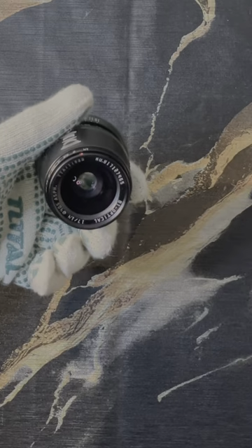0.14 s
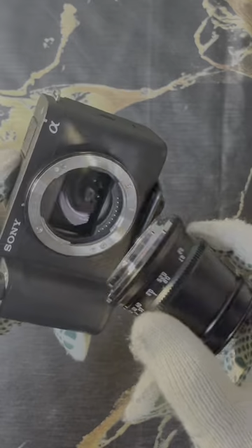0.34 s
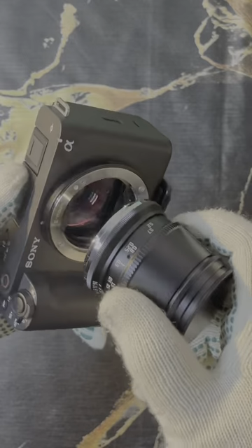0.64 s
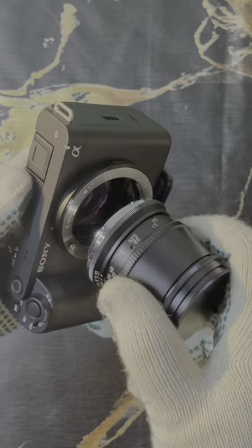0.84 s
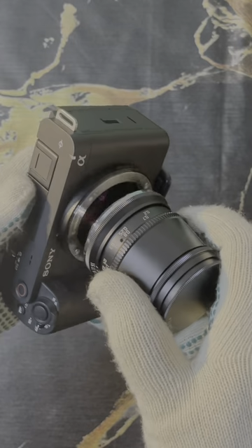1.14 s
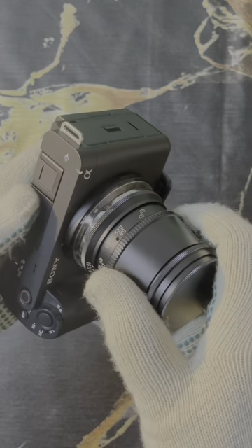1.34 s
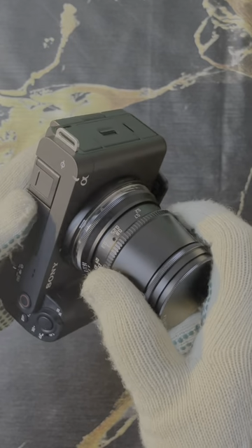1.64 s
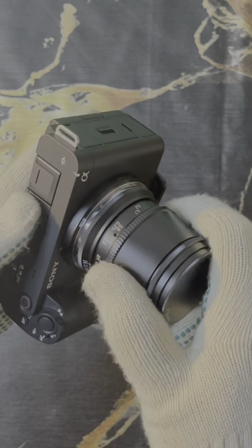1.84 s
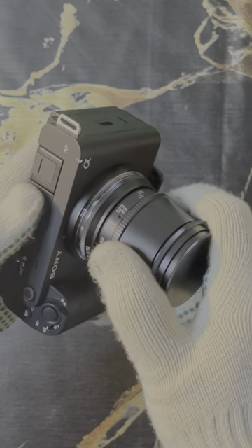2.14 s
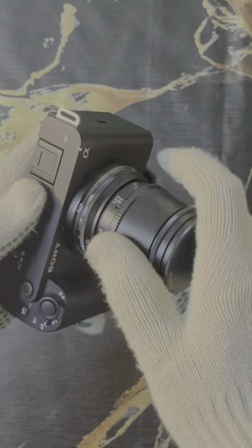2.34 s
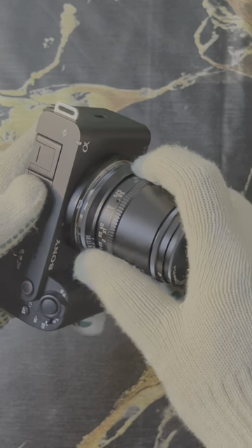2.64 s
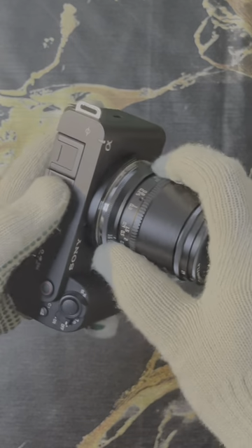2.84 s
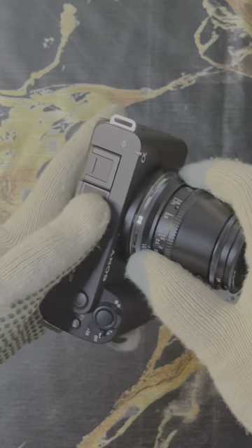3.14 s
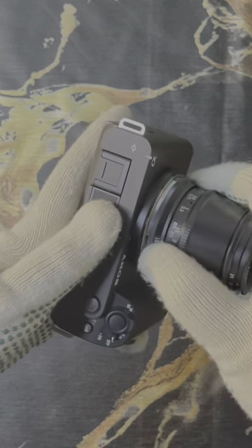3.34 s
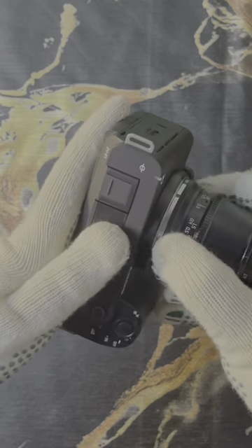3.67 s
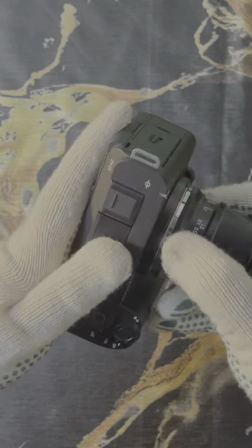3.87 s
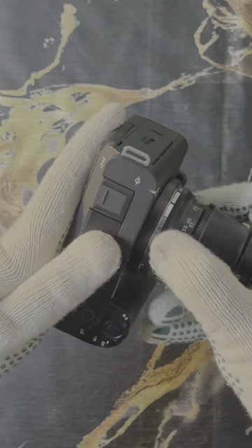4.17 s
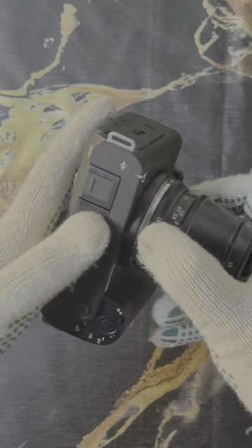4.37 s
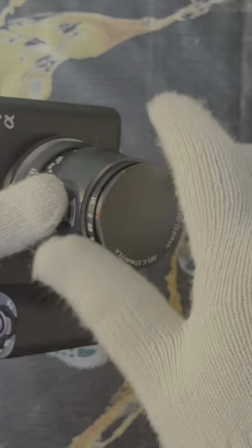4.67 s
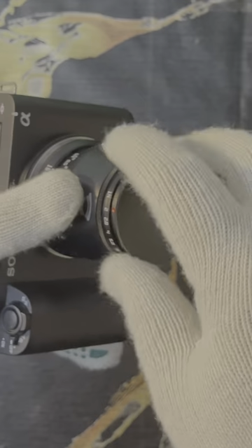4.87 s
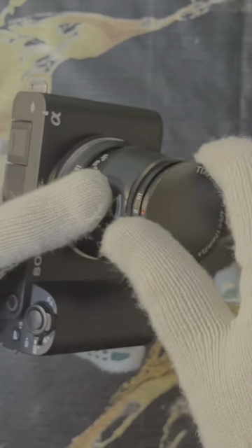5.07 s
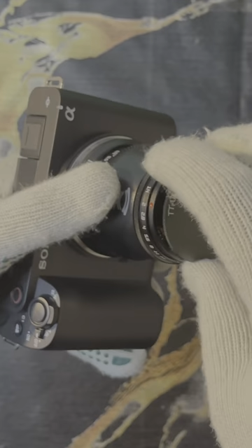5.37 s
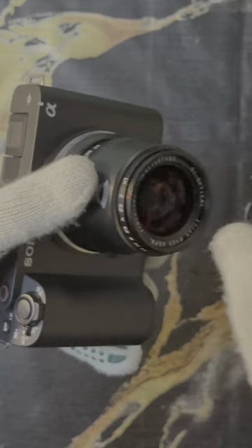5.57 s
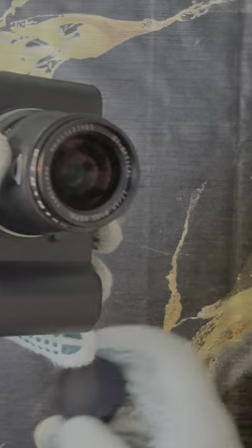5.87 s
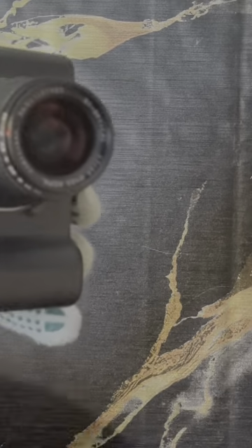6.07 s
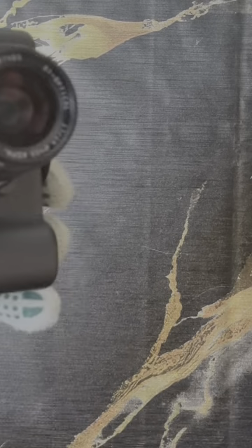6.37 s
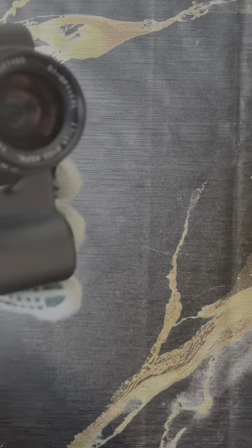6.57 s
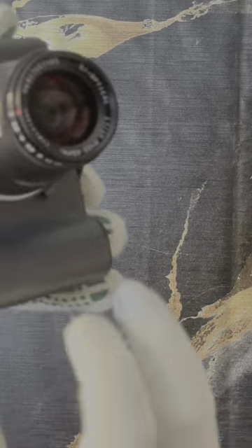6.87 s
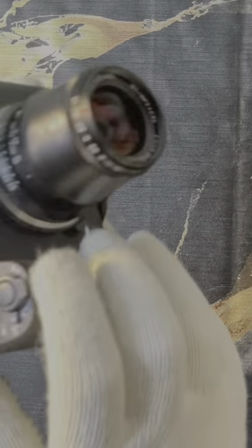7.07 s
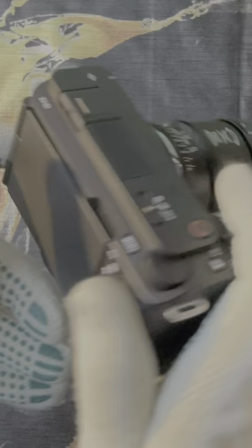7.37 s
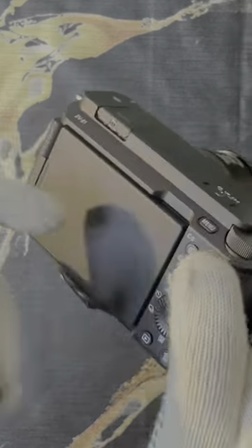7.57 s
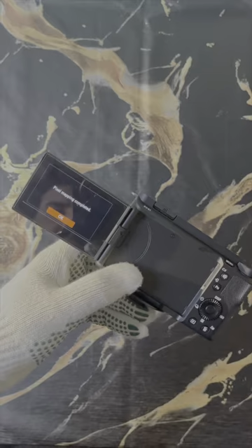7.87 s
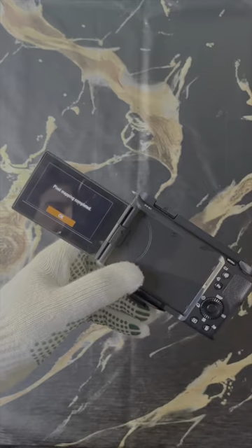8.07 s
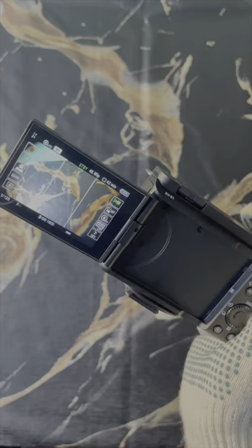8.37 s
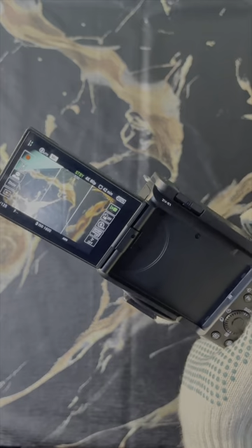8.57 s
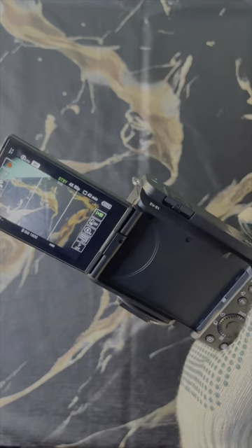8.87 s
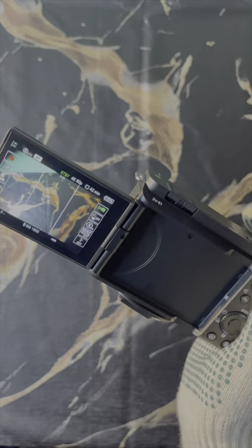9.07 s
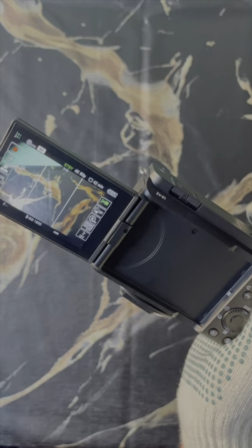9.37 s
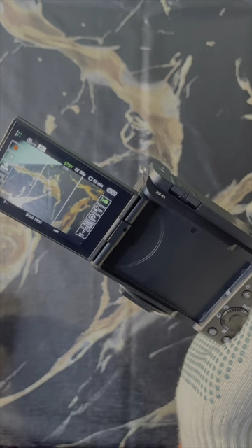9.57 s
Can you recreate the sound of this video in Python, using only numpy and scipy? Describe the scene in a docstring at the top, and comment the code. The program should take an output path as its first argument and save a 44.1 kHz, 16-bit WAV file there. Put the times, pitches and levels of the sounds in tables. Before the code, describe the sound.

Close stereo microphones, slightly stronger on the left, catch dry clicks of lens against camera body over low room rumble. Seating knocks lead to a sharp locking snap, followed by short raspy twists of a metal cap with a thin squeak. The cap lands lightly on the table, cloth slides softly, small clicks and padded bumps follow, and a button presses and releases quietly.

```python
"""A small room with a low hum: gloved hands seat a metal lens on a camera body, twist it until the lock
pin snaps home, unscrew the metal lens cap in a few pushes, set it down, turn the camera over and press a button.
Blows excite damped modes and a noise crack; thread and gloves are trains of friction slips, filtered;
rims are noise-driven resonators. The room answers with dense decaying noise; two ports listen close by."""
import sys
import numpy as np
from scipy import signal
from scipy.fft import rfft, irfft, next_fast_len
from scipy.io import wavfile

SR = 44100
rng = np.random.default_rng(int(sys.argv[2]) if len(sys.argv) > 2 else 0)


def bounce(signal):
    """Save signal as a 16-bit WAV file at the path given by the first command-line argument."""
    frames = np.transpose(np.atleast_2d(signal))
    limited = np.clip(frames, -1, 1)
    pcm = np.round(limited * 32767).astype(np.int16)
    wavfile.write(sys.argv[1], SR, pcm)


N = 428211  # length in samples


def amp(db):
    """Logarithmic level: decibels to amplitude gain."""
    return 10 ** (np.asarray(db) / 20)


def unit(x):
    """Normalisation: scales to rms 1."""
    return x / np.sqrt(np.mean(x ** 2) + 1e-24)


def read(points, hz):
    """Interpolation: joins points by straight lines on a log-frequency axis."""
    f, value = np.transpose(points)
    return np.interp(np.log(hz + 1), np.log(f + 1), value)


def add(mix, s, sound):
    """Superposition: mixes a sound in at time s."""
    part = mix[..., max(round(s * SR), 0):][..., :sound.shape[-1]]
    part += sound[..., :part.shape[-1]]


def colour(x, gain_at):
    """Linear filtering: multiplies the spectrum by a gain given as a function of frequency."""
    n = x.shape[-1]
    size = next_fast_len(n + 2048)
    f = np.fft.rfftfreq(size, 1 / SR)
    return irfft(rfft(x, size) * gain_at(f), size)[..., :n]


def wander(n, rate):
    """Low-passed noise: slow random motion of rms 1."""
    return unit(colour(rng.standard_normal(n), lambda f: np.exp(-(f / rate) ** 2)))


def pan(db):
    """Level difference at constant power: gains of left and right, left higher by db."""
    left = amp(db)
    return np.array([[left], [1]]) * np.sqrt(2 / (1 + left ** 2))


# spectral coherence of the two ports for distant sound: f/Hz, coherence
COHERENCE = [(60, .98), (130, 0.8), (290, .7), (640, 0), (15000, 0)]
# relative spectrum of the room noise: f/Hz, spectral level/dB
NOISE_SPECTRUM = [(15, -33), (30, -14), (42, -3), (62, -2), (82, -7), (108, -7), (150, -19.5), (220, -20.5),
                  (320, -27), (480, -36.5), (1000, -42.5), (2500, -51), (9000, -54), (15000, -65.5)]
NOISE_DB = -54  # rms, before the balance of the ports
# tones of the hum: f/Hz, level/dB (rms, before the balance of the ports)
HUM_TONES = [(59.7, -59), (100, -67)]


def room_noise(left_db=2.5):
    """Partly coherent noise: a low rumble and faint hiss, with a hum whose phase wanders."""
    def shared(f):
        return np.clip(read(COHERENCE, f), -1, 1)

    def independent(f):
        return np.sqrt(1 - shared(f) ** 2)

    a, b = rng.standard_normal((2, N))
    pair = np.array([a, colour(a, shared) + colour(b, independent)])
    noise = amp(NOISE_DB) * unit(colour(pair, lambda f: amp(read(NOISE_SPECTRUM, f))))
    t = np.arange(N) / SR
    hum = np.zeros(N)
    for hz, db in HUM_TONES:
        phase = 2 * np.pi * hz * t + 0.28 * wander(N, 0.64)
        hum += amp(db) * np.sqrt(2) * np.sin(phase)
    return (noise + hum) * pan(left_db)


# a faint dry tick at the outset: t/s, peak level/dB
FIRST_TICK = (.2063, -45.5)


def tick():
    """Exponential pulse: a bare tick with no ring and no echo, alike in both ports."""
    s, db = FIRST_TICK
    out = np.zeros(N)
    add(out, s, amp(db) * np.exp(-np.arange(2 ** 6) / 22.0))  # times in samples
    return out


# modes of the camera with the lens against it: f/Hz, relative level/dB, t60/s
BODY_MODES = [(352.8, -10, 0.26), (418, -14.5, 0.21), (558.2, -5, .035), (810, -5, 0.064),
              (894, -3.5, 0.03), (962, -11, 0.033), (1250, -1, 0.011), (1490, 0, .025), (1574, -3, 0.014),
              (2230, -10, 0.022), (2600, -1, 0.028), (4360, -5, 0.045), (5610, -3, 0.021), (7850, -3, 0.01),
              (9780, 2, 0.026)]
# edges of the bands in which an average blow is described: f/Hz
BAND_EDGES = [250, 650, 1200, 3000, 7000, 14000]
# an average blow's share in each band between those edges: level/dB
BAND_SHARES = [-14.5, -11.5, -9, -6.5, -14]
# the crack of a blow of FIRM_DB dies in DECAY_MS; harder and brighter ones are shorter, light ones scuff on
FIRM_DB, DECAY_MS, HALVING_DB, HALVING_DB_PER_OCTAVE = -40, 3.7, 20.5, 12
PART_OCTAVES = 0.38  # the part struck stands out this widely around its own pitch


def click(level_db, tilt_db, part_hz, part_db, crack_db=14, rise_share=0.23, grip=0.022,
          low_hz=280, high_hz=11000):
    """Impact excitation: damped modes and a noise crack, weighted by how hard and where the contact is."""
    size = 8192
    t, f = np.arange(size) / SR, np.fft.rfftfreq(size, 1 / SR)
    halvings = (level_db - FIRM_DB) / HALVING_DB + tilt_db / HALVING_DB_PER_OCTAVE
    decay_s = DECAY_MS / 2 ** halvings / 1000

    # each new grip loads the modes differently
    detune = 1 + grip * rng.standard_normal(len(BODY_MODES))
    ring = np.zeros(size)
    for k, (hz, db, t60) in enumerate(BODY_MODES):
        ring += (-1) ** k * amp(db - 60 * t / t60) * np.sin(2 * np.pi * hz * detune[k] * t)
    crack = amp(crack_db) * rng.standard_normal(size) * np.exp(-t / decay_s)
    onset = 1 - np.exp(-t / (rise_share * decay_s))
    blow = rfft((ring + crack) * onset)

    # bring the bands to the average blow, then tilt them and lift the part struck
    radiated = 1 / np.hypot(1, (low_hz / (f + 20)) ** 3) / np.hypot(1, (f / high_hz) ** 6)
    edges, power = np.array(BAND_EDGES), abs(blow * radiated) ** 2
    have = np.array([power[(f > a) & (f < b)].sum() for a, b in zip(edges, edges[1:])])
    centres = np.sqrt(edges[1:] * edges[:-1])
    average_db = read(np.c_[centres, BAND_SHARES - 10 * np.log10(have)], f)
    octaves = np.log2(np.maximum(f, edges[0]) / part_hz)
    contact_db = tilt_db * octaves + part_db * np.exp(-0.5 * (octaves / PART_OCTAVES) ** 2)

    # minimum phase keeps the filter from sounding before the blow
    log_gain = np.log(radiated * amp(average_db + contact_db))
    mirrored = np.r_[log_gain, log_gain[-2:0:-1]]
    causal = np.exp(np.conj(signal.hilbert(mirrored)))[:len(f)]
    fade = np.cos(np.pi / 2 * np.arange(size) / size) ** 2
    sound = irfft(blow * causal) * fade
    # the level is the energy of the blow spread over 10 ms
    return amp(level_db) * np.sqrt(SR / 100) * sound / np.linalg.norm(sound)


# reverberation time of the room: f/Hz, t60/s
REVERBERATION = [(250, 0.78), (700, 0.37), (1700, 0.37), (4500, 0.28), (9000, 0.28), (14000, 0.083)]


def room(x, first_s=0.002, build_s=0.0012):
    """Diffuse reverberation: dense reflections build up quickly, each band dying at its own speed."""
    f, t, z = signal.stft(rng.standard_normal((2, SR * 3 // 4)), SR, nperseg=256)
    decay = amp(-60 * t / read(REVERBERATION, f)[:, None])
    tail = signal.istft(z * decay, SR, nperseg=256)[1]
    tail *= np.clip((np.arange(tail.shape[1]) / SR - first_s) / build_s, 0, 1)
    return signal.fftconvolve(x[None], tail / np.linalg.norm(tail[0]), axes=1)[:, :N]


def direct_and_echo(version, left_db, room_db, count=3):
    """Diffuse echo: several independent versions of the sound are averaged, so the reverberation is smooth."""
    direct = pan(left_db) * version()
    # dividing by the root of the count keeps the power of one version
    echo = sum(room(version()) for _ in range(count)) / np.sqrt(count)
    return direct, amp(room_db) * echo


def blows(rows, part_db, left_db, room_db):
    """Successive impacts at one place: the direct sound and its echo."""
    def version():
        out = np.zeros(N)
        for s, *contact in rows:
            add(out, s, click(*contact, part_db))
        return out
    return direct_and_echo(version, left_db, room_db)


# clicks and knocks of lens and body, and of the cap breaking free at 4.44 s: t/s, level/dB, brightness/(dB per
# octave), f/Hz of the part struck
LENS_CLICKS = [(0.9541, -39.5, 1, 9200), (0.9635, -48.5, -1, 1680), (1.1994, -47.5, 2, 900),
               (1.2577, -41, -4.5, 850), (1.3543, -42, -1.5, 950), (1.3622, -40, -2, 870),
               (1.3857, -41.5, -2.5, 900), (1.4017, -30, 0, 950), (1.4142, -28, 1, 1200),
               (1.6995, -62, -2, 800), (1.7212, -48, -1, 1200), (2.2477, -36.5, 0.1, 904),
               (2.2539, -36.5, -1, 1970), (2.3227, -46, -0.5, 400), (3.3067, -49, -2, 950),
               (3.333, -51.5, -0.4, 2000), (3.4688, -49, -1.5, 3200), (3.8497, -37, 10.5, 5000),
               (3.8518, -28.5, 3, 9500), (3.9584, -26.5, 1.5, 1830), (4.4395, -41.5, 6.5, 5830),
               (4.5746, -52, -1, 3500), (4.745, -60, -1.5, 2600), (4.7834, -43, 3.5, 5000),
               (4.926, -51.5, 0.5, 2000), (7.2322, -51.5, 6, 8520), (7.47, -61.5, -2, 2530),
               (7.4835, -48.5, 3.5, 7850)]
# metal parts left ringing, such as the lock spring: t/s, f/Hz, level/dB, t60/s
METAL_RINGS = [(.955, 4517, -65, .35), (.955, 4720, -61, .4), (1.259, 830, -44, .07),
               (1.258, 867, -56, 0.35), (1.415, 404, -50, 0.28), (1.402, 905, -42, .14),
               (2.254, 855, -51, 0.22), (3.96, 1464, -52, .16), (3.853, 2456, -42, .68)]


def lens_and_body(ring_left_db=3, ring_room_db=-13):
    """Impact and free vibration: all clicks and the ringing they leave, direct and echoed."""
    direct, echo = blows(LENS_CLICKS, part_db=9, left_db=5.0, room_db=-10.0)
    ring, t = np.zeros(N), np.arange(SR) / SR
    for s, hz, db, t60 in METAL_RINGS:
        add(ring, s, amp(db - 60 * t / t60) * np.sin(2 * np.pi * hz * t))
    return direct + pan(ring_left_db) * ring, echo + room(amp(ring_room_db) * ring)


def resonate(x, hz, width):
    """Heterodyne resonance: shifts the curve hz down to zero, low-passes, and shifts back."""
    turn, r = np.exp(2j * np.pi * np.cumsum(hz) / SR), np.exp(-np.pi * width / SR)
    return (turn * signal.lfilter([(1 - r) ** 2], [1, -2 * r, r * r], x / turn)).real


# a metal rim of mount or cap singing as it slips: start t/s, end t/s, f/Hz, level/dB before the mix
RIM_SQUEALS = [(1.129, 1.25, 866, -70), (2.794, 2.812, 1730, -72), (4.783, 4.81, 4960, -56),
               (4.8, 4.889, 7670, -39.5), (4.84, 4.9, 7660, -54), (5.248, 5.262, 7600, -48),
               (5.744, 5.776, 7610, -69.5)]


def metal_rim(ring_t60=0.09):
    """Stick-slip excitation: uneven slips, as noise, drive a narrow rim mode that rings on after the stroke."""
    out, t = np.zeros(N), np.arange(SR // 4) / SR
    for start, end, hz, db in RIM_SQUEALS:
        rise = np.minimum(t / 0.0044, 1)
        swell = rise * amp(db - 60 * np.maximum(t - (end - start), 0) / ring_t60)
        tone = resonate(rng.standard_normal(len(t)), np.full(len(t), hz), width=170)
        add(out, start, swell * unit(tone))
    return out


def slips(n, per_s, spread_db):
    """Dry friction: a dense random train of tiny slips of uneven size."""
    size = amp(spread_db * np.minimum(rng.exponential(1, n), 4))
    occurs = rng.random(n) < per_s / SR
    return unit(size * rng.standard_normal(n) * occurs)


def stroke(rows, grain, pivot_hz):
    """Sliding speed: a level curve shapes the grain, a brightness curve shifts weight above the pivot."""
    s, level_db, bright_db = np.transpose(rows)
    t = s[0] + np.arange(len(grain)) / SR
    low = colour(grain, lambda f: 1 / (1 + (f / pivot_hz) ** 4))
    high, lift = grain - low, amp(np.interp(t, s, bright_db))
    # dividing by the expected power keeps brightness from changing the level
    power = np.mean(low ** 2) + 2 * lift * np.mean(low * high) + lift ** 2 * np.mean(high ** 2)
    return amp(np.interp(t, s, level_db)) * (low + lift * high) / np.sqrt(power)


# colour of cotton rubbing: f/Hz, relative level/dB
COTTON_COLOUR = [(150, -19.5), (430, -1.5), (720, 2.5), (1600, -4.5), (3000, -1.5), (6000, -3.5),
                 (9000, -0.5), (12000, -14), (15000, -34.5)]


def cloth(rows, grain_db, flutter_db):
    """Fibre friction: cotton fibres catch and let go along a stroke."""
    n = max(int((rows[-1][0] - rows[0][0]) * SR), 2 ** 8)
    fibres = slips(n, per_s=7700, spread_db=grain_db) * amp(flutter_db * wander(n, 55))
    return stroke(rows, colour(fibres, lambda f: amp(read(COTTON_COLOUR, f))), pivot_hz=3400)


# short rubs, dull from the mount and bright from a glove, before the mix:
# peak t/s, length/s, level/dB, brightness/dB
SHORT_RUBS = [(1.156, 0.046, -61, -3), (1.717, 0.073, -55, -10.5), (2.162, 0.075, -70.5, -0.5),
              (2.279, 0.11, -50.5, -15.5), (2.482, 0.039, -72, 7), (2.785, 0.12, -68.5, 9),
              (3.35, .14, -61.5, -8.5), (3.472, 0.051, -56, -7), (3.648, .04, -71.5, 1),
              (3.754, 0.072, -62.5, -4.5), (3.834, 0.071, -58.5, -5), (6.76, 0.15, -64, 17),
              (7.249, 0.018, -75, -10), (7.322, 0.045, -64.5, 2), (7.424, 0.16, -57, 13),
              (8.293, 0.082, -78.5, 8)]
# sleeve and glove sliding as the hand leaves and comes back: t/s, relative level/dB
SLEEVE_SLIDE = [(5.45, -89.5), (5.86, -92.5), (6.04, -72.5), (6.2, -73), (6.28, -74), (6.73, -74.5),
                (6.88, -78), (7.09, -78), (7.37, -76.5), (7.79, -87), (7.85, -95)]
RUB_RISE = 0.55  # share of a rub spent swelling
SLEEVE_GAIN_DB, SLEEVE_BRIGHT_DB = 3, 2.5


def gloves(fade_db=13):
    """Sliding friction: short rubs as the grip changes, and the long slide of the sleeve."""
    out = np.zeros(N)
    for peak, length, db, bright in SHORT_RUBS:
        start = peak - RUB_RISE * length
        rows = [(start, db - fade_db, bright), (peak, db, bright), (start + length, db - fade_db, bright)]
        sound = cloth(rows, grain_db=0.0, flutter_db=2.0)
        add(out, start, sound * signal.windows.tukey(len(sound), 0.2))
    slide = [(s, db + SLEEVE_GAIN_DB, SLEEVE_BRIGHT_DB) for s, db in SLEEVE_SLIDE]
    add(out, slide[0][0], cloth(slide, grain_db=2, flutter_db=2.2))
    return out


# each push swells, sags as the fingers run out of travel, and stops quickly
TWIST_RISE_DB, TWIST_SAG_DB, TWIST_STOP_DB_PER_S, TWIST_STOP_S = 24.5, 3.5, 1100, 0.028


def push(t, start, peak, end):
    """Effort envelope of one push in dB: swell, sag, stop."""
    before = np.clip((peak - t) / max(peak - start, 1 / SR), 0, 1)
    after = np.clip((t - peak) / max(end - peak, 1 / SR), 0, 1)
    stop_db = TWIST_STOP_DB_PER_S * np.maximum(t - end, 0)
    return -TWIST_RISE_DB * before ** 2 - TWIST_SAG_DB * after - stop_db


# colour of the thread's scrape: f/Hz, relative level/dB
THREAD_COLOUR = [(200, -37), (600, -10.5), (1000, -2.5), (1600, -3.5), (2600, 7), (4000, 0.5), (6000, 2),
                 (9000, -3.5), (10500, -20), (12000, -10), (15000, -26.5)]
# resonances of the cap: f/Hz, width/Hz, level/dB over the scrape
CAP_MODES = [(1450, 210, 8.5), (3220, 44, -8), (5010, 75, 2.5), (5930, 210, -11), (7980, 75, -4),
             (11530, 390, -8), (14600, 180, 17.5)]
# pushes of the fingers that turn the cap, before the mix:
# start t/s, peak t/s, end t/s, level/dB, brightness/dB, first chatter f/Hz, last chatter f/Hz
CAP_PUSHES = [(4.442, 4.445, 4.472, -32, 13, 6080, 6150), (4.761, 4.839, 4.893, -37, 11, 2700, 1600),
              (5.087, 5.132, 5.175, -38.5, 1, 3540, 2330), (5.165, 5.241, 5.269, -36.5, 4.5, 2950, 2000)]
# a faster slide is brighter; a slower one chatters more
BRIGHT_PER_DB, CHATTER_DB, CHATTER_PER_DB = 0.6, -2, -0.42
# the chatter moves to its last pitch around a point just after the peak of the push
CHATTER_LAG_S, CHATTER_GLIDE_S = 0.0046, 0.0136
# the thread's grip is uneven, so the chatter's pitch jumps about (share, Hz)
CHATTER_JITTER, CHATTER_JITTER_HZ = 0.11, 87.5


def cap_thread(grit_db=1.5, grit_hz=190):
    """Friction-driven resonance: metal slips in the fine thread; chatter glides with the fingers' pressure."""
    def cap_gain(f):
        modes = sum(amp(db) / (1 + 2j * (f - hz) / width) for hz, width, db in CAP_MODES)
        return amp(read(THREAD_COLOUR, f)) * (1 + modes)

    out = np.zeros(N)
    for start, peak, end, db, bright, first_hz, last_hz in CAP_PUSHES:
        t = np.arange(start, end + TWIST_STOP_S, 1 / SR)
        effort_db = push(t, start, peak, end)
        level_db, bright_db = db + effort_db, bright + BRIGHT_PER_DB * effort_db
        drive = slips(len(t), per_s=5000, spread_db=1.5) * amp(grit_db * wander(len(t), grit_hz))
        scrape = stroke(np.c_[t, level_db, bright_db], colour(drive, cap_gain), pivot_hz=3200)

        glide = (1 + np.tanh((t - peak - CHATTER_LAG_S) / CHATTER_GLIDE_S)) / 2
        jitter = 1 + CHATTER_JITTER * wander(len(t), CHATTER_JITTER_HZ)
        hz = (first_hz + (last_hz - first_hz) * glide) * jitter
        chatter = amp(level_db) * unit(resonate(drive, hz, width=700))
        share = amp(CHATTER_DB + CHATTER_PER_DB * bright_db)
        add(out, start, (scrape + share * chatter) / np.hypot(1, share))
    return out


# the loose cap set down on the table: t/s, level/dB, brightness/(dB per octave), f/Hz of the part struck
CAP_LANDING = [(6.3211, -54.5, 1.5, 2470), (6.328, -50, -2.5, 448), (6.411, -52.5, 3, 2800),
               (6.429, -51.5, -0.5, 2800), (6.446, -65, 9, 3200)]


def cap_set_down():
    """Impact farther off, so more reverberant; the part struck stands out more in the light cap."""
    return blows(CAP_LANDING, part_db=10.5, left_db=3.5, room_db=-2.5)


# soft bumps of the camera in the hands: t/s, f/Hz, level/dB before the mix, length/s
SOFT_BUMPS = [(7.8, 148.7, -48.5, 0.17), (7.882, 106.5, -46.5, .14), (9.064, 94.6, -49.5, 0.14)]


def bumps():
    """Cushioned impact: padded pushes give low cycles with soft edges."""
    out = np.zeros(N)
    for s, hz, db, length in SOFT_BUMPS:
        n = int(length * SR)
        phase = 2 * np.pi * np.cumsum(hz * (1 + 0.158 * wander(n, 40))) / SR
        add(out, s, amp(db) * np.hanning(n) * np.sin(phase))
    return out


# the button going down and springing back: t/s, level/dB over 10 ms, decay/ms
BUTTON_SNAPS = [(8.86, -44.5, 6), (9.014, -49, 3.6)]
# colour of the dull press, then of the bright release: f/Hz, relative level/dB
SNAP_COLOURS = [
    [(120, -8), (300, -1.5), (600, -5.5), (1000, -4), (1750, -11), (2300, -22), (2800, -31), (3400, -23.5),
     (4000, -31), (4900, -19), (6500, -32), (7700, -20.5), (10000, -30), (14000, -55)],
    [(150, -9), (600, -1.5), (1700, -3), (2600, -4.5), (4000, -6.5), (5000, 6), (5800, 6), (6800, -4),
     (7700, 4.5), (9300, -3.5), (11000, -27), (14000, -31)],
]


def button():
    """Snap-through buckling: a dome buckles under the thumb and springs back, as coloured noise bursts."""
    t = np.arange(SR // 8) / SR

    def version():
        out = np.zeros(N)
        for (s, db, decay_ms), points in zip(BUTTON_SNAPS, SNAP_COLOURS):
            snap = colour(rng.standard_normal(len(t)), lambda f: amp(read(points, f)))
            snap *= np.exp(-t / (decay_ms / 1000)) * (1 - np.exp(-t / 0.0025))
            add(out, s, snap * amp(db) * np.sqrt(SR / 100) / np.linalg.norm(snap))
        return out
    return direct_and_echo(version, left_db=3, room_db=-1.5)


# left port over right, as the case shades the right, on top of a sound's own balance: f/Hz, level/dB
CASE_SHADING = [(200, -5), (500, -0.5), (1500, 0), (3000, 0.5), (5000, 12), (7500, 0.5), (9500, -4.5),
                (15000, -5)]


def ports(x, lead_ms=0.092):
    """Diffraction and delay: the hands are nearer the left port; the right hears them shaded and later."""
    def gains(f):
        left = amp(read(CASE_SHADING, f))
        right = np.exp(-2j * np.pi * f * lead_ms / 1000)
        return np.array([left, right]) * np.sqrt(2 / (1 + left ** 2))
    return colour(x, gains)


def scene():
    """Superposition: the handling close by, its echo, and the room's own noise."""
    clicks, clicks_echo = lens_and_body()
    rim, cotton = metal_rim(), gloves()
    cap = cap_thread() + rim
    cap_down, cap_down_echo = cap_set_down()
    press, press_echo = button()
    direct = clicks + cap_down + press
    direct = direct + pan(db=3.5) * amp(0.5) * cap
    direct = direct + pan(db=4.0) * (cotton + bumps())
    # each group of sounds has its own randomly drawn reverberation
    echo = clicks_echo + cap_down_echo + press_echo
    echo = echo + room(amp(-10) * cap + amp(-2) * cotton)
    return ports(direct) + pan(db=4) * echo + room_noise() + tick()


# microphone colour: f/Hz, level/dB
MICROPHONE_COLOUR = [(6300, -1), (7000, -4), (8200, -1.5), (9400, 0.5), (10300, -15), (12000, -1.5),
                     (13500, -16), (15000, -8.5)]
EDGE_HZ = 16000  # upper band limit


def record(dry):
    """Frequency response: microphone colour, then the band limit."""
    heard = colour(dry, lambda f: amp(read(MICROPHONE_COLOUR, f)))
    low_pass = signal.firwin(511, EDGE_HZ, window=("kaiser", 9), fs=SR)
    return signal.oaconvolve(heard, low_pass[None], "same")


dry = scene()
out = record(dry)
bounce(out)
```